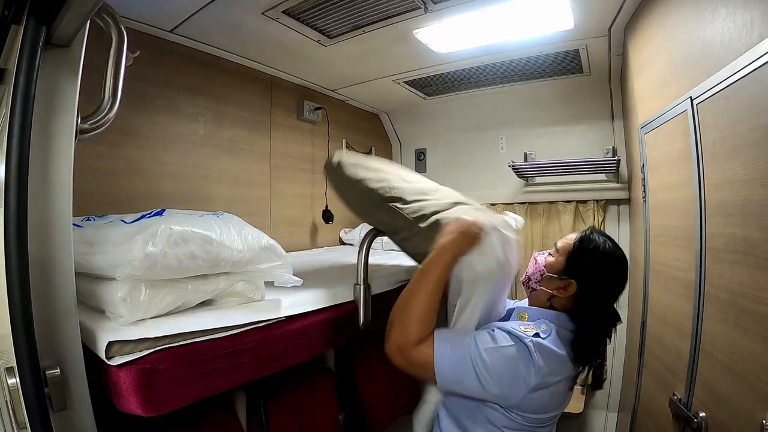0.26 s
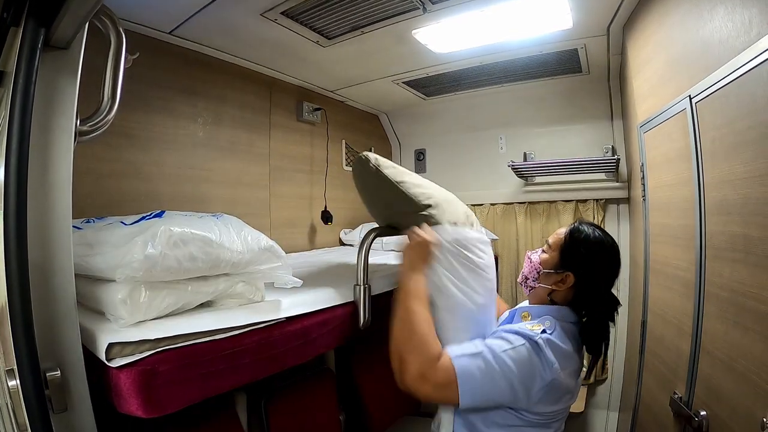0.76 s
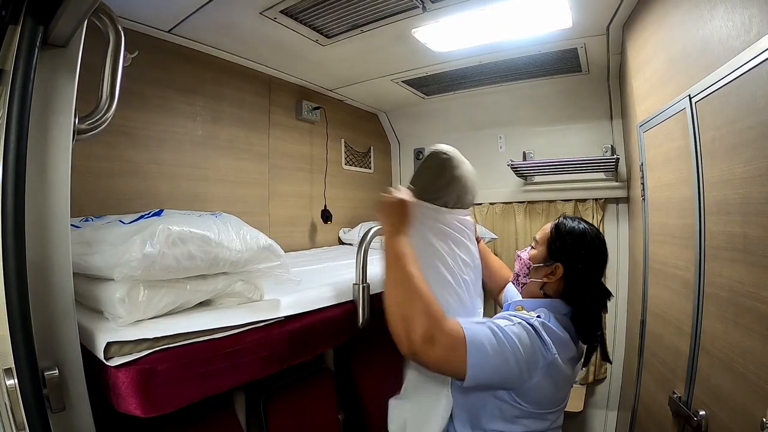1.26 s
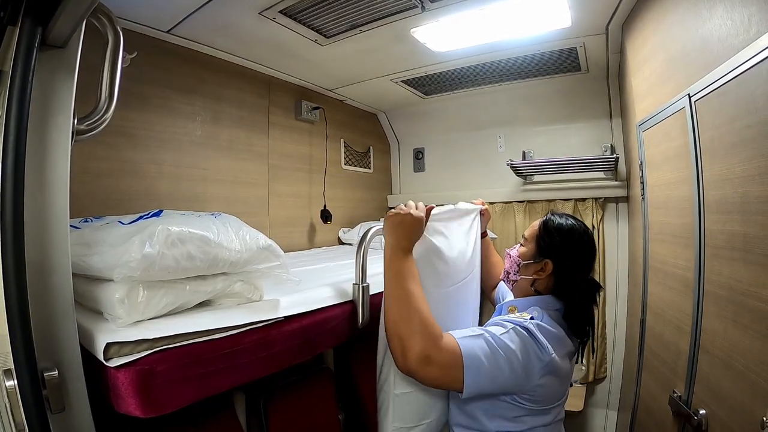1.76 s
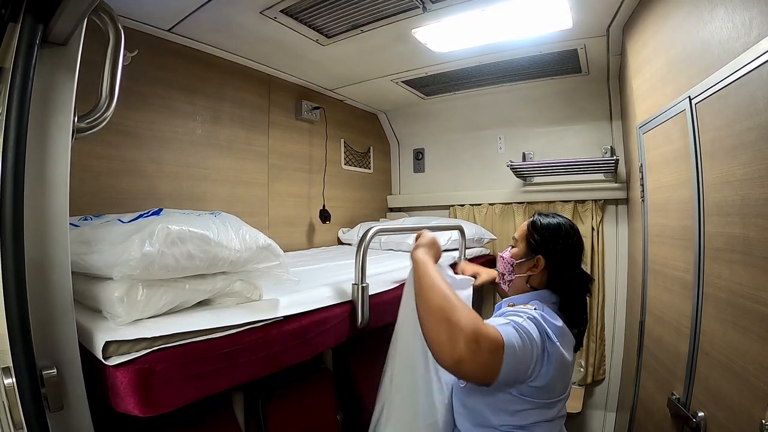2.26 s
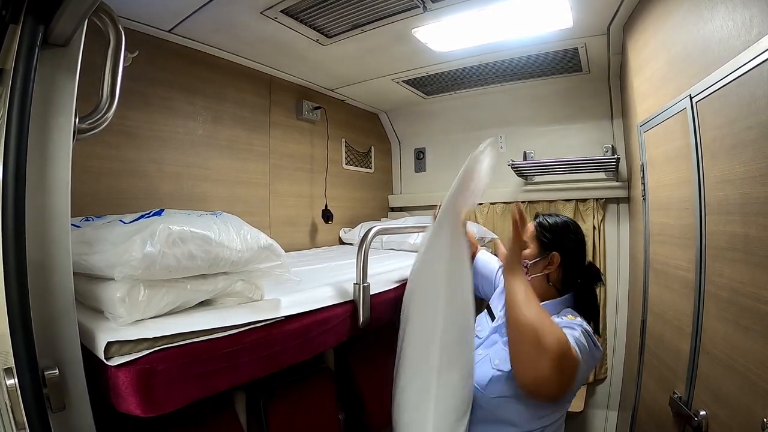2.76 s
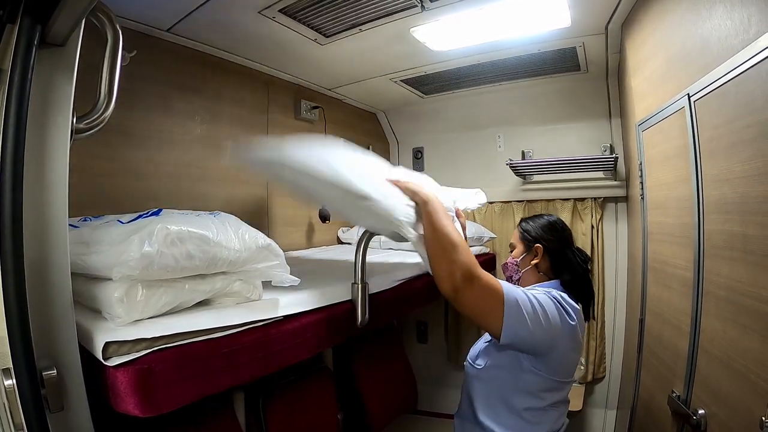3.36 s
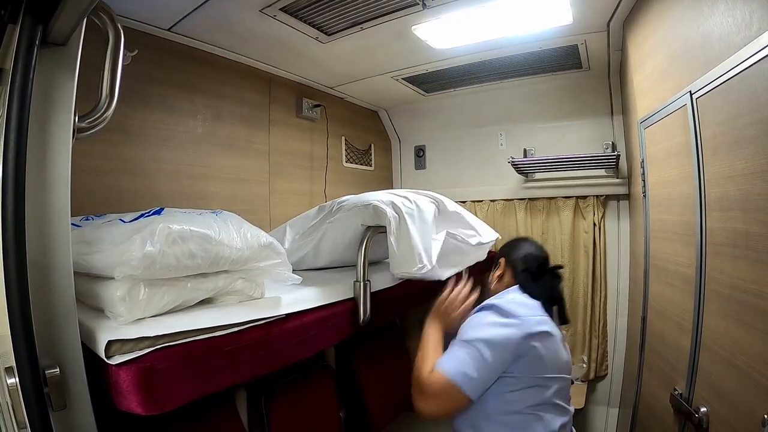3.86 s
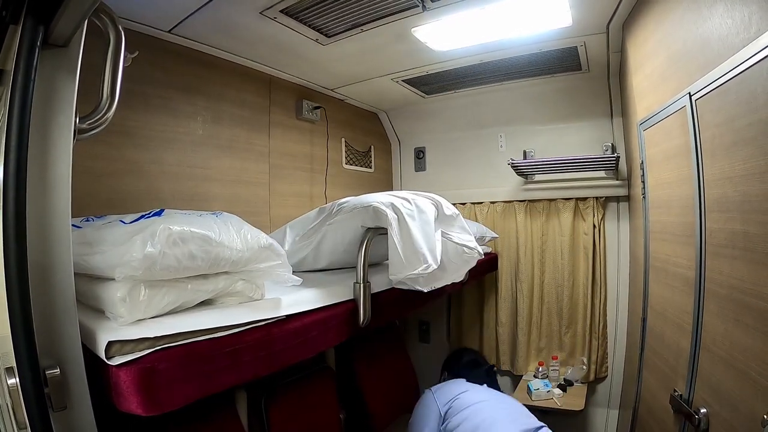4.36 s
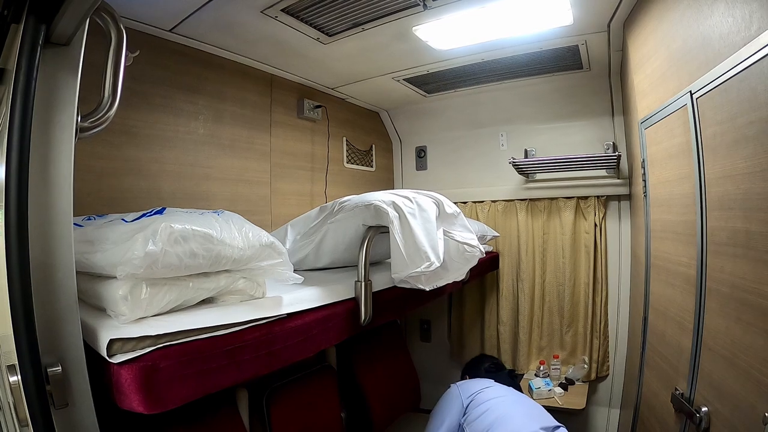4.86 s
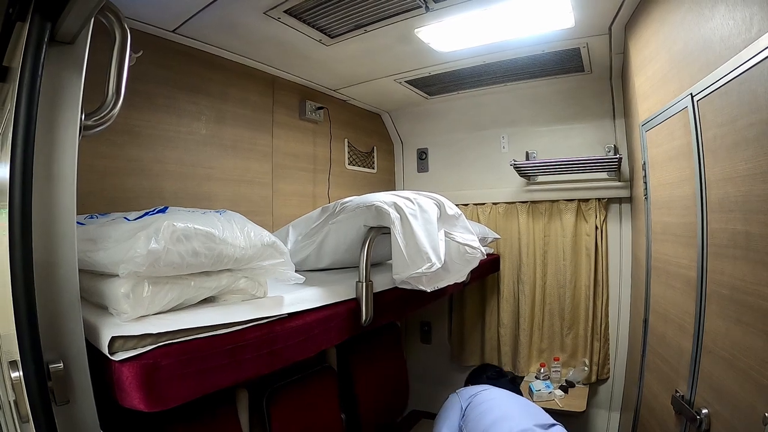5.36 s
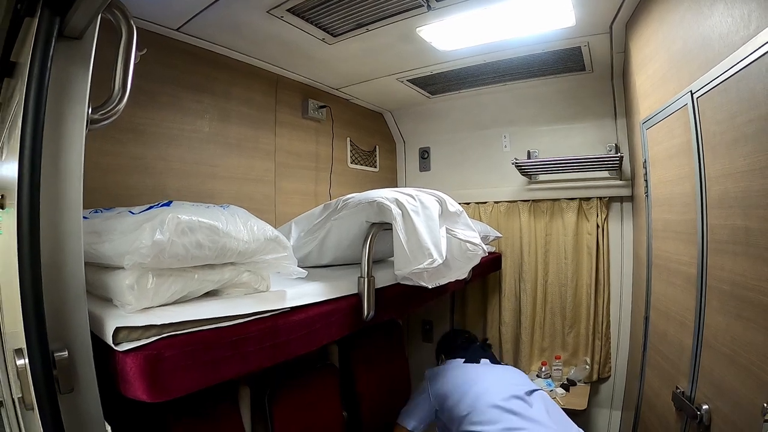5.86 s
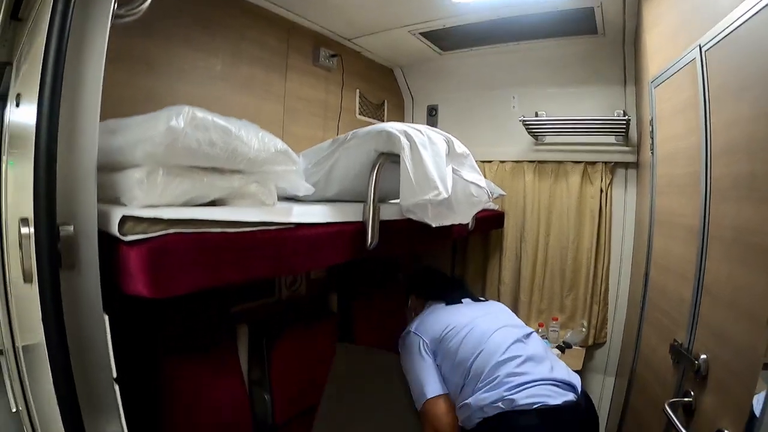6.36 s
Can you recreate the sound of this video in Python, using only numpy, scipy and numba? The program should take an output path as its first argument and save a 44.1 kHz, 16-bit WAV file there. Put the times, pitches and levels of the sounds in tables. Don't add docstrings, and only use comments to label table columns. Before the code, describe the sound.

Brisk fabric rubbing leads to a hollow bump and several fast pillow shakes, with small button ticks. Softer, brighter cotton slides follow, then a padded drop on the bunk and a near pause. A latch clicks twice, the bunk bangs and creaks in a tight cluster, and only slight cloth movement remains. Steady low fan and motor hum; close, dry stereo with a very short diffuse tail.

```python
import sys
import numpy as np
from scipy import signal
from scipy.fft import rfft, irfft, next_fast_len
from scipy.io import wavfile
from scipy.ndimage import uniform_filter1d
from numba import njit

SR = 44100
rng = np.random.default_rng(int(sys.argv[2]) if len(sys.argv) > 2 else 0)


def inscribe(sig):
    pcm = np.round(np.clip(np.atleast_2d(sig).T, -1, 1) * 32767)
    wavfile.write(sys.argv[1], SR, pcm.astype(np.int16))


def volts(x):
    e = np.asarray(x, float) / 20
    return 10 ** e


N = 290883

WALL_SPREAD = 384


def level(x):
    return x / np.sqrt(np.mean(x ** 2))


def peak(x, db):
    return x * volts(db) / np.abs(x).max()


def log_interp(hz, points):
    f, v = np.transpose(points)
    return np.interp(np.log(np.maximum(hz, 1)), np.log(f), v)


def colour(x, points):
    size = next_fast_len(N)
    gain = volts(log_interp(np.fft.rfftfreq(size, 1 / SR), points))
    return irfft(rfft(x, size) * gain, size)[..., :N]


@njit
def svf(x, hz, width):
    y = np.empty(len(x))
    band, low = 0., 0.
    g, k = np.tan(np.pi * hz / SR), width / hz
    for i in range(len(x)):
        v = (band + g * (x[i] - low)) / (1 + g * (g + k))
        band = 2 * v - band
        low = low + 2 * g * v
        y[i] = k * v
    return y


def resonance(x, hz, width):
    return svf(x, float(hz), float(width))


def steep(x, hz, width):
    return resonance(resonance(x, hz, width), hz, width)


def walk(rate):
    k = int(SR / rate)
    held = np.repeat(rng.standard_normal(N // k + 1), k)
    return 1.2 * uniform_filter1d(uniform_filter1d(held, k), k)[:N]


def add(out, s, sound, pan_db):
    i = int(s * SR)
    out[:, i:i + len(sound)] += (sound * volts(np.array([[pan_db], [-pan_db]]) / 2))[:, :N - i]


def burst(t60, rise_s):
    t = np.arange(SR // 2) / SR
    return rng.standard_normal(len(t)) * (1 - np.exp(-t / rise_s)) * volts(-60 * t / max(t60, .01))


def snap():
    return np.r_[1., 1., np.zeros(SR // 2 - 2)]


def boards(x):
    # (pitch [Hz], width [Hz], level [dB])
    panel_modes = [(123.4, 36, 8), (196.6, 27, 5.5), (257.5, 31, 2), (304, 53, 3), (351, 16, -14),
                   (518, 180, -7.5)]
    return sum(volts(db) * resonance(x, hz, width) for hz, width, db in panel_modes)


def grains(spread_db, patchy_db, patch_rate):
    sizes = np.minimum(rng.exponential(size=N), 4)
    return rng.standard_normal(N) * volts(spread_db * sizes + patchy_db * walk(patch_rate))


def creases(clump_db):
    slips = grains(2.56, 2.95, 50)
    folds = np.zeros(N)
    for hz in 300 * 2 ** np.arange(0, 4.5, .25):
        folds += volts(clump_db * walk(35)) * resonance(slips, hz, 0.29 * hz) / np.sqrt(hz)
    return folds


def gesture(rows, shape, rest_db):
    attack, release, sag_db = shape
    t = np.arange(N) / SR
    power = volts(np.array(rest_db)[:, None]) ** 2
    for s, length, *layer_db in rows:
        corners = s + length * np.array([0, attack, max(1 - release, attack), 1])
        effort = np.interp(t, corners, [0, 1, volts(sag_db), 0])
        power = power + np.outer(volts(np.array(layer_db)), effort ** 0.76) ** 2
    return np.sqrt(power)


def cloth():
    # (start [s], length [s], fibre hiss [dB], fold rustle [dB], flap [dB])
    slide_rows = [(-.1, 0.19, -54, -51, -40.5), (.06, 0.12, -46.5, -45.5, -40), (.15, 0.19, -53, -51, -38),
                  (.27, .19, -43.5, -43.5, -42), (.42, 0.39, -53, -51.5, -48), (.72, 0.21, -48, -43, -41),
                  (.8, 0.1, -44.5, -38.5, -35), (.9, 0.85, -50, -46.5, -36),
                  (1.545, 0.092, -44.5, -37, -33.5), (1.58, 0.48, -45.5, -45.5, -44.5),
                  (2.1, 0.18, -50.5, -49.5, -39.5), (2.19, 0.098, -52, -48, -50),
                  (5.11, 0.15, -58, -36.5, -37), (5.22, 0.12, -54.5, -46, -40),
                  (2.31, 0.081, -60, -53, -41.5), (2.5, 0.31, -51.5, -51, -42.5),
                  (2.75, 0.25, -65, -52.5, -43.5), (2.98, 0.2, -55.5, -52, -37),
                  (3.08, 0.64, -52, -53, -43.5), (3.68, 0.21, -51, -52.5, -40), (3.9, 0.66, -62, -59, -53),
                  (4.11, .08, -62, -53, -50), (4.28, 0.093, -59, -65, -56), (4.48, 0.13, -56.5, -50.5, -32),
                  (1.95, 0.51, -60, -52.5, -47), (5.66, 0.35, -70, -76, -61),
                  (5.58, 0.094, -55.5, -53, -56), (5.88, 0.11, -60, -68, -45),
                  (6.02, 0.68, -58.5, -54, -58)]
    shake_rows = [(.895, 0.12, -38.5, -37.5, -19.5), (1.025, 0.11, -41.5, -40, -29),
                  (1.175, 0.1, -43.5, -32.5, -36), (1.295, 0.11, -41.5, -38, -29.5),
                  (1.43, 0.085, -49, -44, -44), (4.83, 0.069, -42, -34, -31),
                  (5.028, 0.069, -42.5, -23.5, -42), (5.31, 0.11, -50, -26, -23),
                  (4.89, 0.24, -51, -33, -26), (5.07, 0.26, -50, -37, -32.5), (5.7, 0.083, -79, -75, -60),
                  (5.94, 0.063, -69, -70, -54)]
    jerk_rows = [(.91, 0.13, -51, -27, -16.5), (1.095, 0.057, -46, -35.5, -27),
                 (1.225, 0.07, -51, -33, -25), (1.312, 0.04, -46, -30, -40), (1.186, .04, -50, -35, -45),
                 (2.999, .04, -56, -46, -50), (4.5, .08, -55, -42, -40), (1.466, .06, -43, -27, -33),
                 (3.562, 0.056, -42.5, -32.5, -43), (4.717, 0.057, -54, -37, -33.5),
                 (4.772, 0.076, -37, -47, -49), (4.862, 0.072, -46, -20, -20.5),
                 (5.06, 0.058, -48, -40, -37), (2.53, 0.035, -56.5, -51, -55),
                 (5.255, 0.15, -54, -49, -26.5), (5.848, .06, -51.5, -45, -42)]
    # (start [s], length [s], level [dB])
    swing_rows = [(-.05, 0.61, -39), (.28, 0.35, -32), (.62, 0.21, -29), (.85, 0.32, -32), (1.2, .12, -28),
                  (1.462, 0.06, -26), (1.65, 0.25, -39), (2.13, 0.13, -38.5), (2.38, .1, -42),
                  (2.65, 0.37, -44), (3.15, 0.33, -44), (3.55, 0.12, -26.5), (3.62, 0.32, -36),
                  (4.27, 0.19, -34), (4.49, 0.17, -33.5), (4.74, 0.054, -35), (4.83, 0.088, -21.5),
                  (4.93, 0.09, -20.5), (5.03, 0.1, -16), (5.15, 0.17, -26.5), (5.3, 0.19, -15.5),
                  (5.45, 0.33, -31), (5.82, 0.29, -38.5), (6.08, 0.23, -39), (6.35, 0.12, -39.5)]
    # (frequency [Hz], density [dB per Hz])
    fibre_colour = [(600, -40), (1000, -14), (1300, -3.5), (1750, -4.5), (2740, -5.5), (4020, -6.5),
                    (6510, -13), (8600, -17), (12600, -29), (15500, -35)]
    # (frequency [Hz], density [dB per Hz])
    fold_colour = [(330, -12), (450, -11), (560, -2.5), (860, -3), (1150, -0.5), (1400, -2.5), (1650, -9.5),
                   (3250, -12.5), (4500, -30), (6500, -59)]

    slides = gesture(slide_rows, (0.23, 0.28, 0), (-76, -64, -52))
    shakes = gesture(shake_rows, (0.32, 0.4, -1.2), [-np.inf])
    jerks = gesture(jerk_rows, (0.039, 0.56, -10.5), [-np.inf])
    hiss, fold, flap = slides + shakes + jerks
    push, = gesture(swing_rows, (0.18, 0.37, -1.6), (-49,))

    fibres = level(colour(grains(1.26, 0.36, 60), fibre_colour))
    cased_s = 2.8
    sheen_gain = volts(np.interp(np.arange(N) / SR, [cased_s - .2, cased_s], [-21.5, -12.5]))
    sheen = level(steep(fibres, 11200, 15300)) * sheen_gain
    folds = level(colour(creases(1.6), fold_colour))
    flaps = level(resonance(boards(grains(3.2, 0.92, 30)), 198, 350))
    air = rng.standard_normal(N)
    low_air = resonance(resonance(air, 34, 44), 35, 60)
    deep_air = steep(rng.standard_normal(N), 23.2, 14.7)
    puffs = level(low_air + .6 * steep(air, 78, 45) + 0.83 * deep_air)

    rubbing = volts(3.0) * (hiss * fibres + slides[0] * sheen)
    return rubbing + volts(-1.5) * fold * folds + volts(-5.5) * flap * flaps + volts(-1.0) * push * puffs


def ventilation():
    # (frequency [Hz], density [dB per Hz])
    rush_colour = [(12, -39), (25, -6.5), (50, 0), (80, -2.5), (112, -6.5), (213, -8.5), (439, -17),
                   (857, -22), (985, -24), (1500, -26), (5230, -35), (8640, -38), (12800, -55),
                   (15500, -83)]
    # (pitch [Hz], width [Hz], level [dB])
    motor_lines = [(47.6, 6.8, -48), (124, 12.4, -50.5), (200, 6.3, -58.5), (246.2, 2.2, -59),
                   (300, 7.6, -57)]
    # (pitch [Hz], rms level [dB])
    mains_tones = [(49.6, -52.5), (200.2, -54)]
    rush_db = -45 + 1.5 * walk(1.4)
    out = volts(rush_db) * level(colour(rng.standard_normal(N), rush_colour))
    for hz, width, db in motor_lines:
        out += volts(db) * level(resonance(rng.standard_normal(N), hz, width))
    for hz, db in mains_tones:
        out += volts(db) * np.sqrt(2) * np.sin(2 * np.pi * hz * np.arange(N) / SR)
    return out


def ticks():
    # (time [s], peak [dB], ring [Hz], t60 [s], left minus right [dB])
    tick_rows = [(0.087, -36.5, 1500, 0.22, 14), (1.037, -26.5, 1370, 0.086, -5),
                 (2.167, -37.5, 730, 0.043, -1), (2.336, -34, 723, 0.078, 1), (2.532, -47, 600, 0.083, 0.5),
                 (2.643, -36.5, 1010, 0.13, -3), (2.793, -43, 1040, 0.065, 1.0),
                 (3.001, -38, 641, 0.053, -3), (3.081, -32.5, 1070, 0.036, -6), (3.973, -47, 875, 0.11, 8),
                 (4.309, -39, 1300, 0.048, -2), (5.643, -39, 1030, 0.031, -1), (5.85, -42, 770, 0.1, -6)]
    out = np.zeros((2, N))
    for s, db, hz, t60, pan_db in tick_rows:
        crack = snap() + 0.15 * burst(t60, 0.00059)
        ring = resonance(steep(crack, hz, 0.53 * hz), hz, 0.1 * hz)
        ring = ring + 0.26 * steep(crack, 1.45 * hz, 0.39 * hz)
        add(out, s, peak(ring + 0.06 * steep(crack, 2200, 4300), db - 0.5), pan_db)
    return out


def knocks():
    # (time [s], pitch [Hz], level [dB], t60 [s])
    knock_rows = [(4.503, 340, -27, 0.21), (4.503, 670, -34.5, 0.19), (4.503, 1690, -42, .08),
                  (.912, 125, -18.5, 0.36), (.914, 194.6, -13, .4), (.925, 290, -18, .2),
                  (.912, 250, -16.5, .25), (.913, 350, -13, 0.12), (.912, 506, -23, .3),
                  (.912, 662, -26, 0.19), (4.836, 172, -11, .12), (4.836, 97, -18, .25),
                  (4.836, 590, -31, .1), (3.563, 213, -18.5, .12), (3.563, 290, -18.5, 0.076),
                  (3.563, 105, -21, 0.24), (5.395, 62, -11, .6), (5.3, 95, -22, .15), (5.14, 95, -24, .3),
                  (3.62, 40, -26, .5), (4.93, 700, -30, .25), (5.33, 91, -19, .2), (5.08, 83, -21, .2),
                  (1.228, 97, -24, 0.17)]
    rise_cycles = 0.55
    out, t = np.zeros((2, N)), np.arange(SR // 2) / SR
    for s, hz, db, t60 in knock_rows:
        fade = volts(db - 60 * t / max(t60, .02)) * (1 - np.exp(-t * hz / rise_cycles))
        add(out, s, fade * np.sin(2 * np.pi * hz * t), 0)
    return out


def thumps():
    # (time [s], peak [dB], board pitch [Hz], slap above 600 Hz [dB], t60 [s])
    blow_rows = [(.913, -14, 200, -18, 0.1), (1.187, -24, 87, -31, 0.13), (1.316, -24.5, 103, -34, .12),
                 (1.47, -13.5, 90, -27, 0.096), (3.564, -17, 217.6, -22.5, 0.11),
                 (3.595, -24.5, 62, -45, 0.27), (4.836, -20.5, 168, -20.5, 0.19),
                 (4.864, -14.5, 135, -22, 0.11), (4.887, -8.5, 111, -41, 0.14),
                 (5.033, -22.5, 170, -18.5, 0.15), (5.059, -18.5, 295.4, -24, 0.19),
                 (5.326, -11.5, 61.6, -24, 0.076), (5.337, -22.5, 95, -18, 0.27),
                 (5.371, -10.5, 118, -17.5, 0.072), (5.334, -29, 290, -22, 0.1)]
    overtone = 3.6
    out, t = np.zeros((2, N)), np.arange(SR // 2) / SR
    for s, db, hz, slap_db, t60 in blow_rows:
        swing = np.sin(2 * np.pi * hz * t) + 0.12 * np.sin(2 * np.pi * overtone * hz * t)
        swing = swing * volts(-60 * t / max(t60, .01))
        panels = resonance(boards(burst(t60, 0.00093)), 190, 640)
        body = swing + 0.8 * peak(panels, 0)
        slap = resonance(steep(burst(0.98 * t60, 0.00036), 1350, 2650), 1460, 3900)
        add(out, s, peak(body, db - 0.5) + peak(slap, slap_db - 1.5), 0)
    return out


def creaks():
    # (time [s], length [s], first pitch [Hz], last pitch [Hz], level [dB])
    creak_rows = [(5.12, .08, 1330, 1500, -32), (5.148, 0.038, 890, 1094, -32),
                  (5.18, 0.053, 1400, 1130, -29.5), (5.192, .03, 1750, 1820, -30),
                  (5.243, .02, 3300, 2500, -40), (5.04, 0.033, 910, 830, -29),
                  (5.25, 0.045, 1050, 960, -39), (5.33, 0.033, 1500, 1300, -33),
                  (1.72, 0.262, 1200, 1150, -46), (1.3, 0.065, 1400, 1300, -38),
                  (1.35, 0.068, 290, 279, -32.5), (2.4, 0.072, 1500, 1550, -46.5)]
    out = np.zeros((2, N))
    for s, length, first_hz, last_hz, db in creak_rows:
        hz = np.linspace(first_hz, last_hz, int(length * SR))
        rough = 0.82 + 0.87 * level(resonance(rng.standard_normal(len(hz)), 70, 180))
        glide = np.sin(2 * np.pi * np.cumsum(hz) / SR)
        add(out, s, volts(db) * rough * glide * np.hanning(len(hz)), 0)
    return out


def latch():
    # (pitch [Hz], level [dB])
    latch_modes = [(1000, 5), (1330, 5), (2500, 2.5), (3500, -1), (5200, -7), (8800, -22)]
    # (time [s], peak [dB], t60 [s])
    click_rows = [
        (4.72, -21.5, 0.11),
        (4.774, -28.5, 0.043),
    ]
    out = np.zeros((2, N))
    for s, db, t60 in click_rows:
        crack = snap() + 0.14 * burst(t60, 0.0015)
        ring = np.zeros(len(crack))
        for hz, mode_db in latch_modes:
            ring += volts(mode_db) * resonance(steep(crack, hz, .5 * hz), hz, 0.12 * hz)
        add(out, s, peak(ring, db + 2.0), 1.5)
    return out


def scuffs():
    # (time [s], level [dB], length [s])
    scuff_rows = [
        (4.911, -39.5, 0.057),
    ]
    out = np.zeros((2, N))
    for s, db, length in scuff_rows:
        noise = rng.standard_normal(int(length * SR))
        scrape = steep(noise, 8500, 1500) + 0.65 * steep(noise, 10900, 2000)
        scrape = scrape + steep(steep(noise, 12500, 3000), 12200, 3000)
        t = np.arange(len(scrape)) / len(scrape)
        add(out, s, volts(db) * level(scrape) * np.minimum(8 * t, 1) * (1 - t), -2.0)
    return out


def cabin(x, t60):
    t = np.arange(SR // 3) / SR
    tail = rng.standard_normal(len(t)) * volts(-60 * t / t60)
    return signal.fftconvolve(x, tail / np.sqrt(np.sum(tail ** 2)))[:N]


def scatter(x):
    overlap = 288
    cells = signal.stft(x, nperseg=WALL_SPREAD, noverlap=overlap)[2]
    turned = cells * np.exp(2j * np.pi * rng.random(cells.shape))
    return signal.istft(turned, nperseg=WALL_SPREAD, noverlap=overlap)[1][:, :N]


def scene():
    # (frequency [Hz], level [dB])
    scattered_share = [(60, -22), (250, -18.5), (700, -8.5), (2000, -7), (5000, -5), (12000, -5)]
    # (frequency [Hz], level [dB])
    common_share = [(700, -1.5), (2000, -3), (4000, -4), (6000, -7.5), (9000, -14), (13000, -20)]
    spread = cloth() + ventilation() + scuffs()
    hits = ticks() + knocks() + thumps() + creaks() + latch()
    spread = spread + volts(-8.5) * cabin((hits + spread).mean(axis=0), t60=0.29)
    late = scatter(colour(spread + 0.63 * hits, scattered_share))
    late = np.roll(late, WALL_SPREAD // 2, axis=1)
    direct = colour(hits, [(3000, -0.2), (7000, -5)]) + colour(spread, common_share)
    return direct + volts(5.5) * late


def band_limit(x):
    return signal.sosfilt(signal.butter(12, 15680, fs=SR, output="sos"), x)


def record(dry):
    left_lag = 2
    left_colour = [(60, 0.95), (300, 1.0), (1500, 0.86), (3000, 2.0), (6000, 0.4), (12000, -4.5)]
    left = colour(np.roll(dry[0], left_lag), left_colour)
    pair = colour(np.array([left, dry[1]]), [(13500, -0.5), (16000, -5.0)])
    pair = pair + volts(-9) * steep(pair.mean(axis=0), 8660, 1400)
    soft_top = 0.7
    mix = soft_top * np.tanh(pair / soft_top)
    return band_limit(mix)


dry = scene()
out = record(dry)
inscribe(out)
```